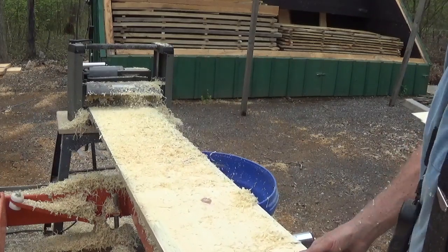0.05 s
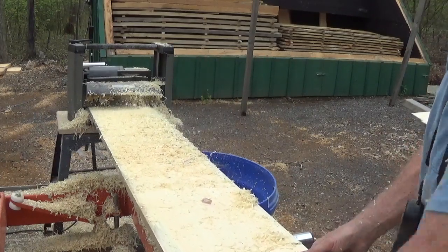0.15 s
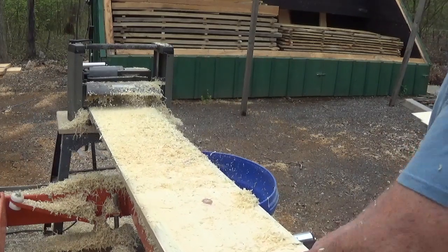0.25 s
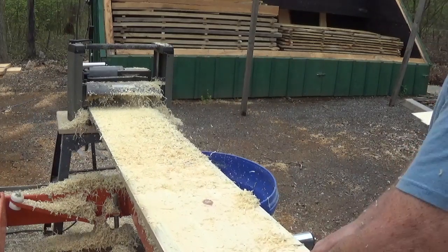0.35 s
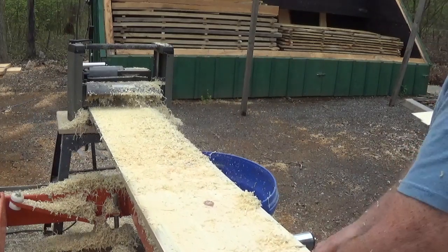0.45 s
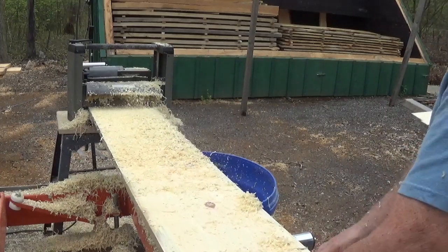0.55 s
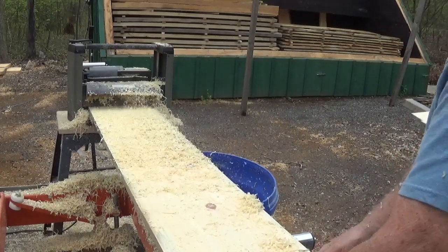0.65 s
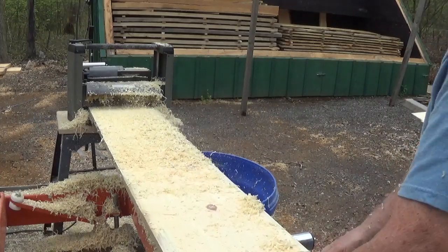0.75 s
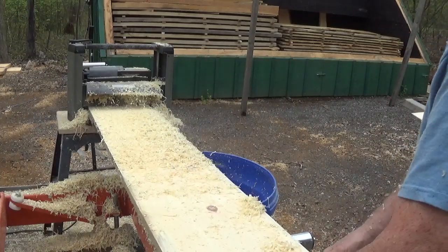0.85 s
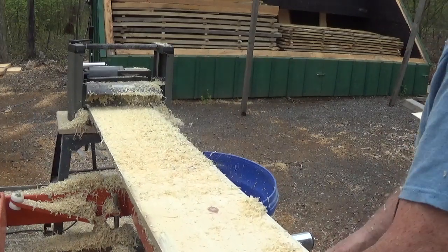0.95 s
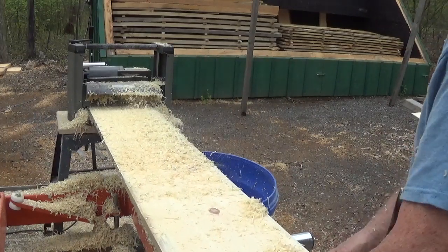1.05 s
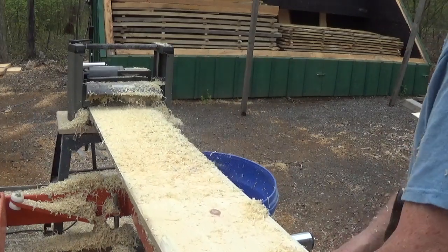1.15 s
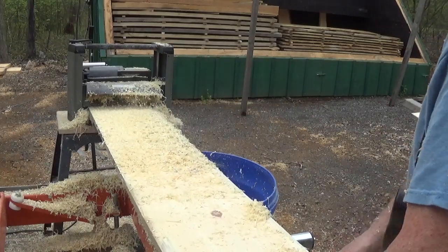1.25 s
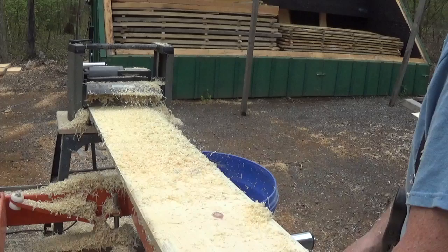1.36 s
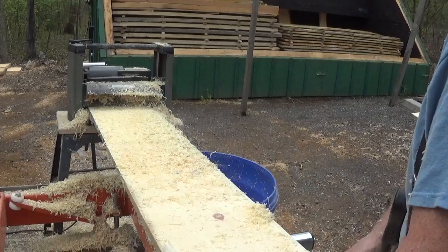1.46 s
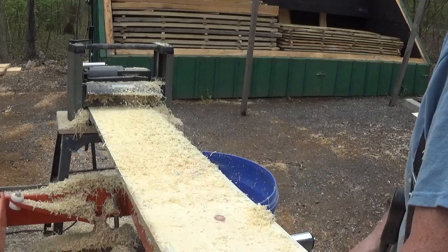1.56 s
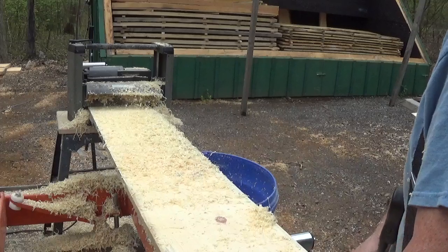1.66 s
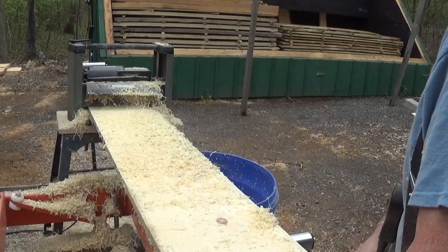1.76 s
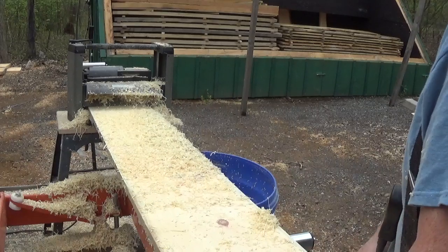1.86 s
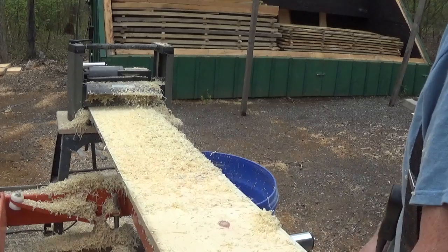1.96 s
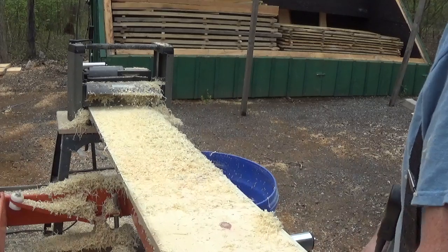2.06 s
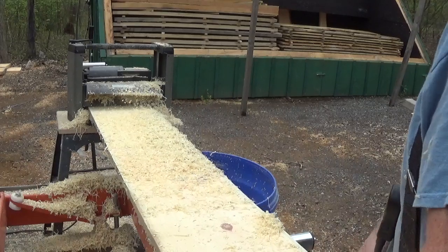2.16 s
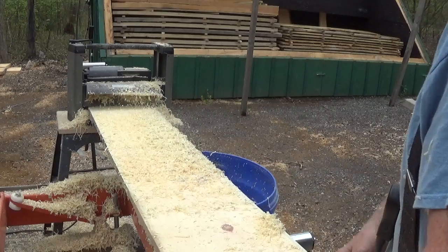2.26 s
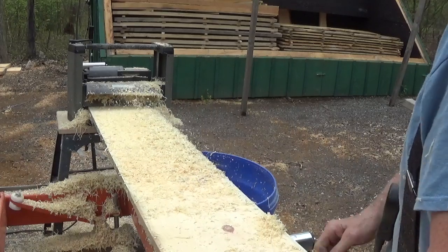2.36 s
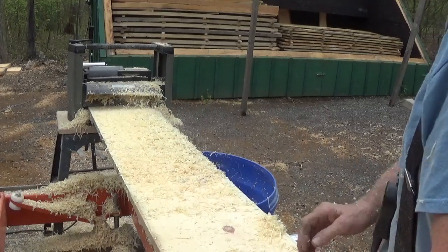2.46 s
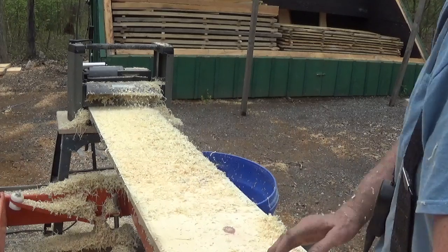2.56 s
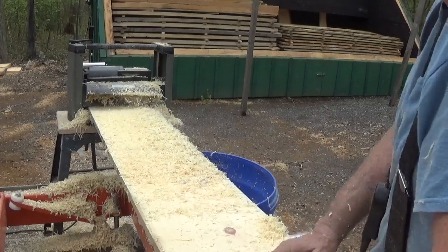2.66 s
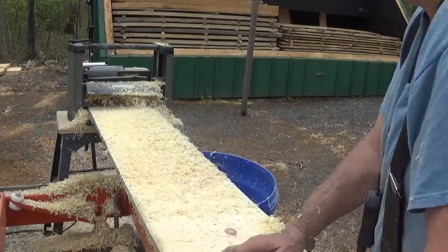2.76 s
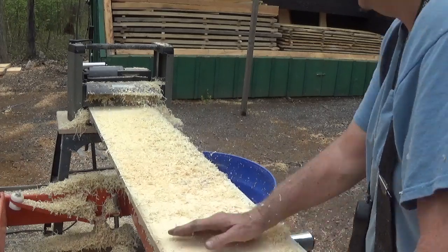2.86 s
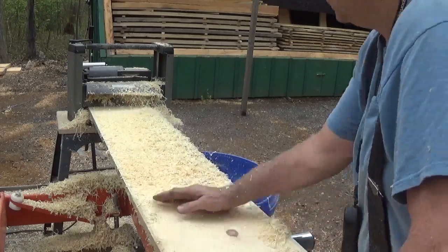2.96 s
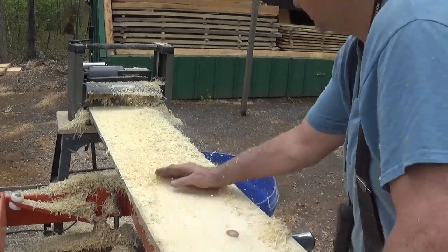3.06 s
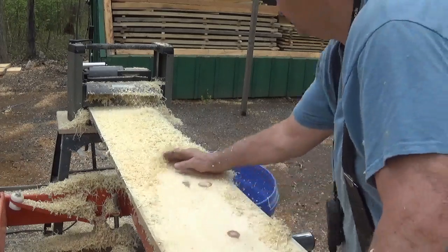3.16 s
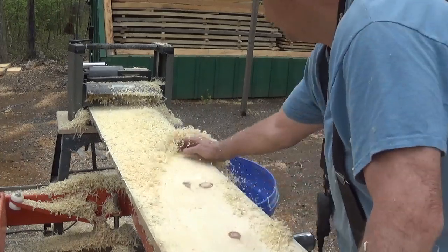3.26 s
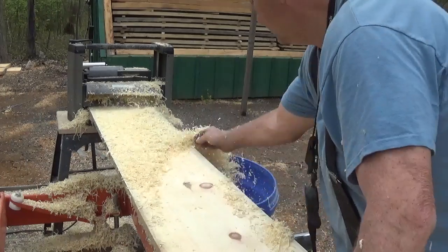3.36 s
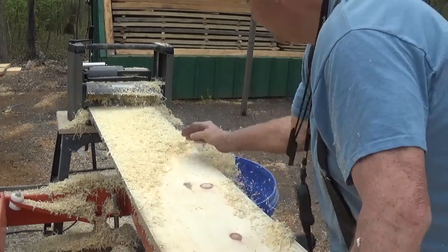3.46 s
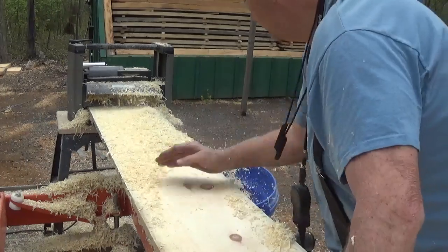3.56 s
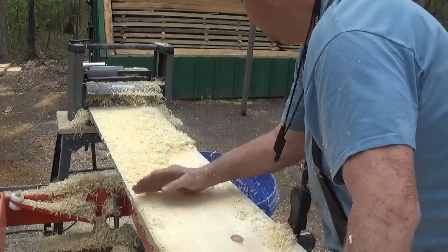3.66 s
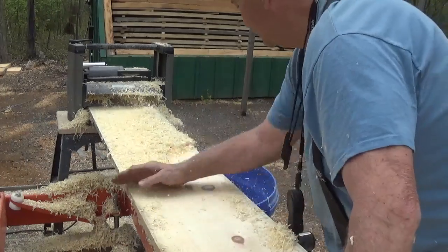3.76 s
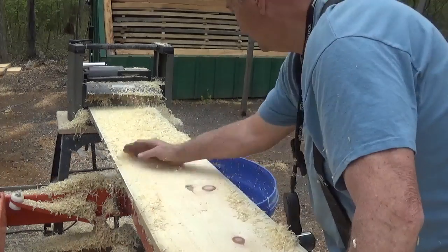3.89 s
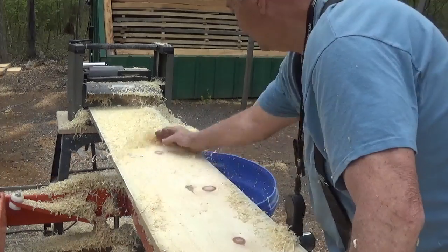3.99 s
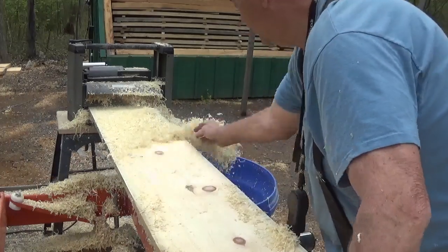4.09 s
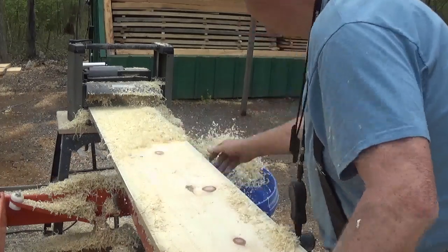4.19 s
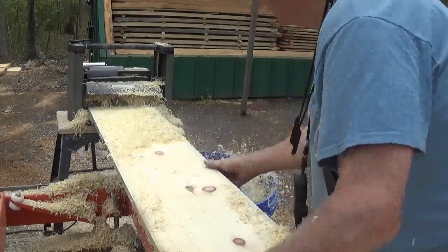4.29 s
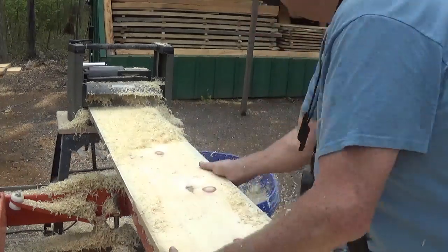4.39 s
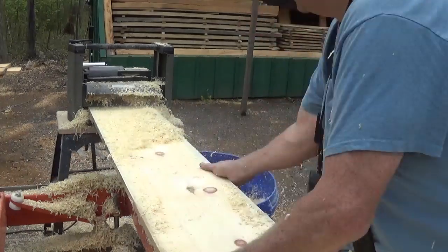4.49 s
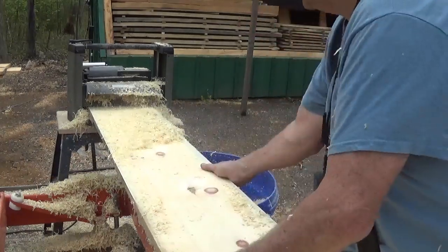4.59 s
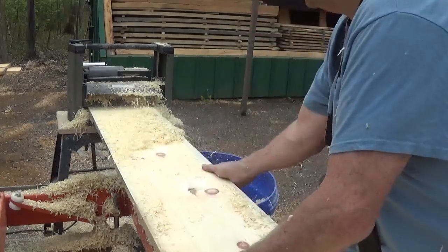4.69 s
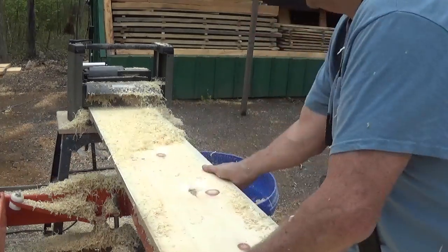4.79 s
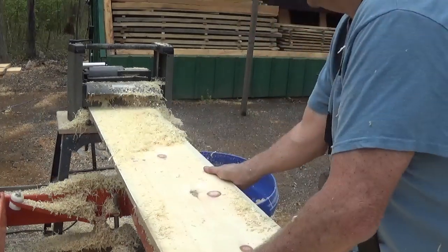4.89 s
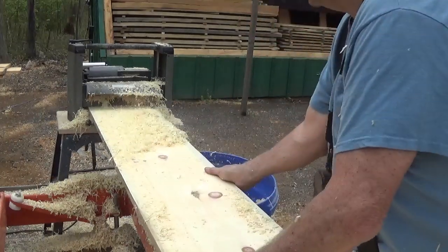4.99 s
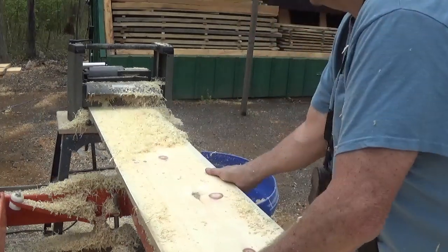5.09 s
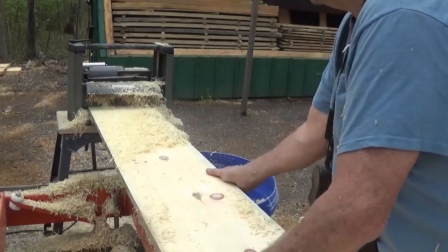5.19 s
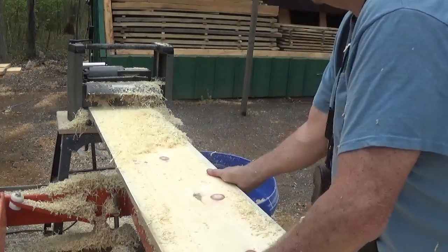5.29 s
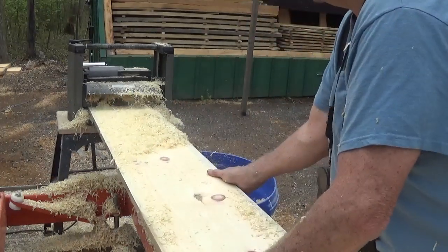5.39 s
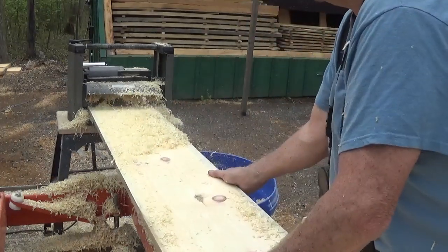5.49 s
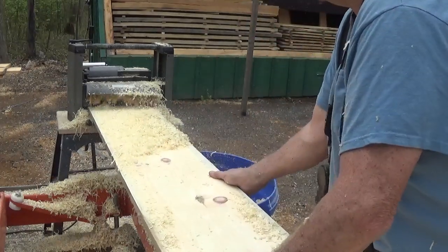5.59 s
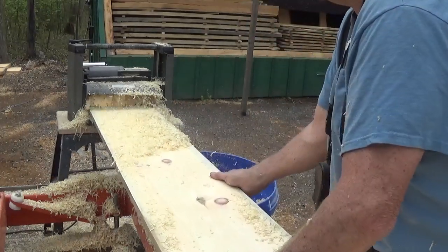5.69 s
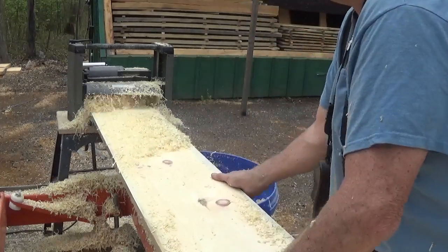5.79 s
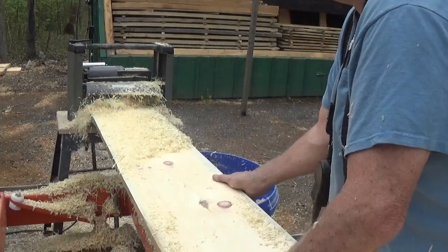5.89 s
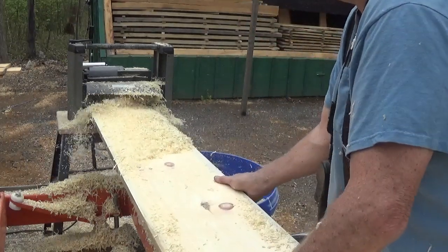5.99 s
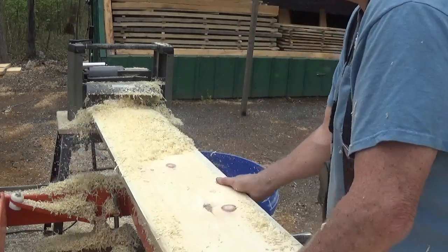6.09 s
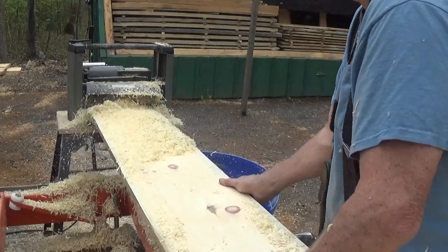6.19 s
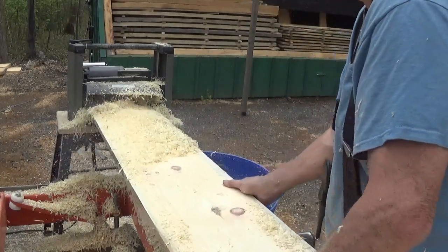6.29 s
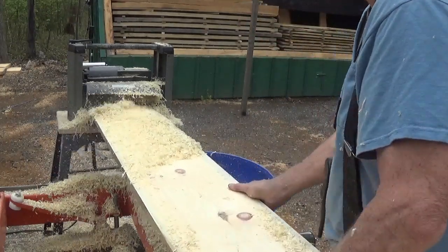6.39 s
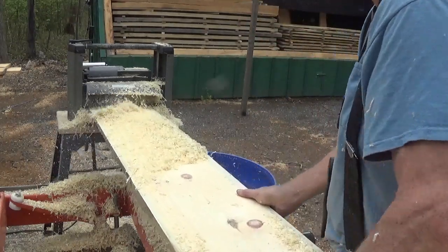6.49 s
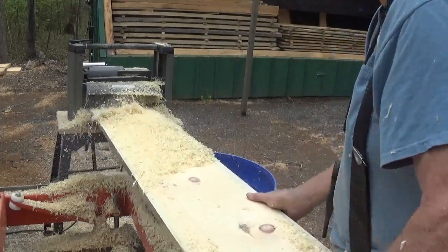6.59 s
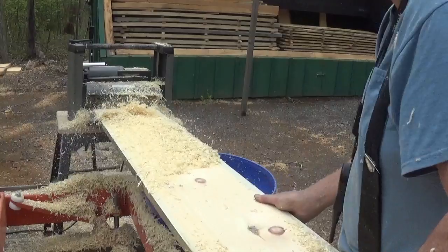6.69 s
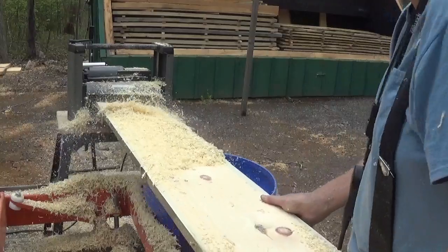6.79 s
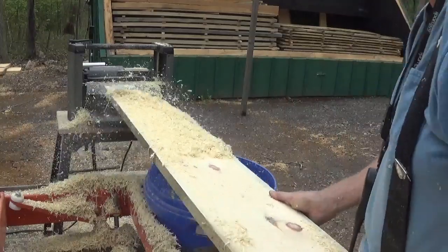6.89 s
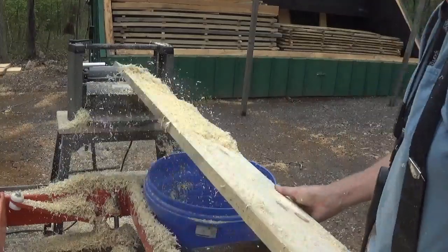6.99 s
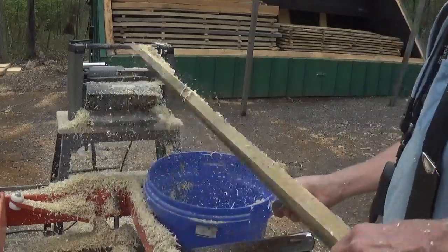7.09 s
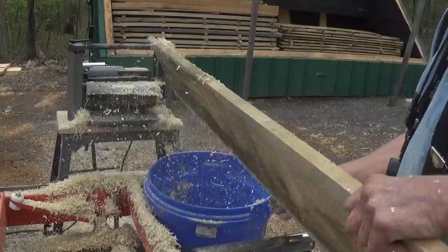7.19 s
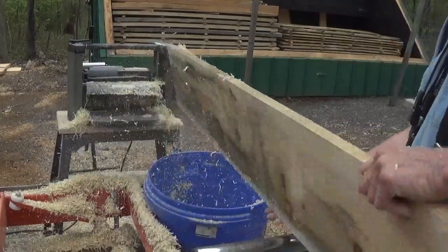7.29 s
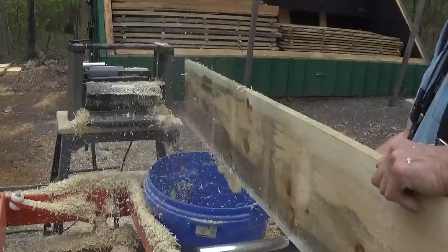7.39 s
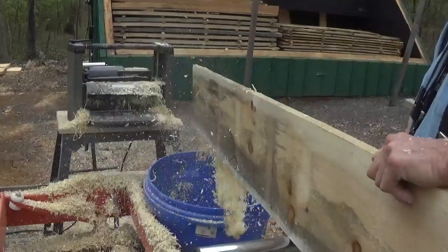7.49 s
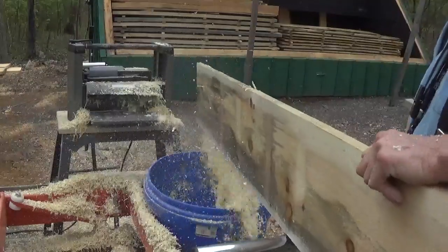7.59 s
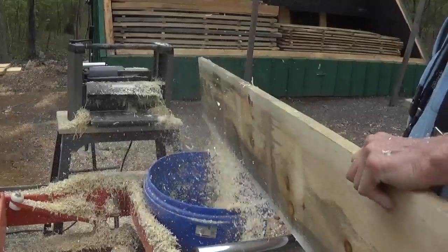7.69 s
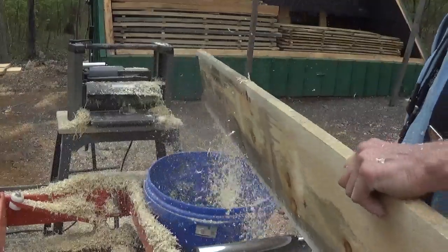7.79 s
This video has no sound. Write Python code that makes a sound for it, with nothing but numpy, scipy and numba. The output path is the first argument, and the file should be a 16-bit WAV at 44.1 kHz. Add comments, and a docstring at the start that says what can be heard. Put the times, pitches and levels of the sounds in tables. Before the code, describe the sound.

A benchtop planer is already cutting a wide board, a loud, harsh, rough buzz with gliding hollow howls and tearing chip noise. Just before six seconds the board clears and the cut stops abruptly, leaving a much quieter airy motor whine that climbs in pitch. The board, lifted off, knocks once, short and bright. Close stereo microphone in an open yard with faint dull echoes, dry and slightly limited on top.

```python
"""Benchtop planer, one board

Outdoors, two knives strike a wide board in turn; the blows ring resonances that swell and glide as it feeds.
The board clears and the motor runs up free: noise bands for air, sines locked to the head for spinning parts.
The board is lifted off and knocks once on something hard: a noise crack and short decaying modes.
The ground, a shed and a stack return a few dull echoes of the cut and the knock."""
import sys
import numpy as np
from scipy import signal
from scipy.io import wavfile
from scipy.ndimage import uniform_filter1d
from numba import njit

SR = 44100
rng = np.random.default_rng(int(sys.argv[2]) if len(sys.argv) > 2 else 0)


def unload_wav(signal):
    """Save mono or channel-first audio to the path in sys.argv[1] as 16-bit WAV at rate SR, clipped to [-1, 1]."""
    wavfile.write(
        sys.argv[1],
        SR,
        np.round(np.clip(np.atleast_2d(signal).T, -1, 1) * 32767).astype(np.int16),
    )


N = 346185
SECONDS = np.arange(N) / SR


# knives in the wood: start_s, gain_db
CONTACT = [(5.8, 2.5), (5.83, 1), (5.85, -28), (5.9, -53)]
# roughness of the tearing grain, on blow scatter and tearing alike: start_s, gain_db
GRAIN = [(0, 1.5), (3, 2), (4.3, 5), (4.85, -1), (4.93, 5.5), (5.3, 1.5), (5.8, 0)]
# loudness of the cut: start_s, middle_db, then against the middle: low_end_db, treble_db, top_db
CUT = [(0.0, -16.5, -17, -7.5, -13), (0.29, -18.5, -11.5, -4.5, -8), (0.43, -17, -30, -8, -10),
       (0.7, -20, -17.5, -7.5, -10.5), (1.38, -19, -18, -7, -10.5), (2.25, -16, -18.5, -9, -16),
       (2.55, -20, -26, -8.5, -11), (2.82, -20, -21, -9, -13), (2.96, -17, -23, -9.5, -13),
       (3.8, -18.5, -8, -10, -10), (4.31, -16.5, -4, -6.5, -13), (4.5, -18, -4.5, -5, -12.5),
       (4.68, -20.5, 4, -3.5, -9.5), (4.88, -18, -8.5, -2, -9), (4.96, -16.5, -3.5, -9, -11.5),
       (5.09, -14, -8.5, -11.5, -15), (5.31, -18.5, -6.5, -10, -17), (5.65, -17.5, -9.5, -5, -12.5),
       (5.78, -18.5, -13, -1.5, -10)]
BOARD_CUT_HZ = 232   # the board radiates little below here


def cutting(turns):
    """Blows ring the board; chips fly and the frame shakes while the knives are in the wood."""
    grain = from_db(in_time(GRAIN)[0])
    cut_db = in_time(CUT)
    blows = knife_blows(turns, grain)
    board = rings(turns) + board_resonances(blows, cut_db) + swells(blows)
    highpass = signal.butter(4, BOARD_CUT_HZ, "high", fs=SR, output="sos")
    out = signal.sosfilt(highpass, board) + chips(grain) + frame_shake(turns, cut_db)
    return from_db(in_time(CONTACT)[0]) * out


EDGE_LAG_MS = 0.041   # the knives differ in edge shape: their unlike part lands just after the blow
TEAR_MS = 3.6   # time constant of the tearing burst after each blow


def knife_blows(turns, grain):
    """Like blows give even multiples of head speed, unlike knives the odd; scatter and tearing add noise."""
    count = int(2 * turns[-1])
    alike = knife_train(turns, np.ones(count))
    unlike = knife_train(turns, (-1.) ** np.arange(count), EDGE_LAG_MS)
    uneven = knife_train(turns, rng.standard_normal(count))
    burst = signal.lfilter([1], [1, -np.exp(-1000 / (TEAR_MS * SR))], alike)
    torn = rms_one(burst * rng.standard_normal(N)) * np.std(alike)
    return np.array([alike, drawn_out(alike), unlike, drawn_out(unlike), grain * uneven, grain * torn])


def knife_train(turns, sizes, lag_ms=0.):
    """One blow each half turn, shared between the two samples around its exact time."""
    at = np.interp(np.arange(len(sizes)) / 2, turns, np.arange(N)) + lag_ms * SR / 1000
    whole = np.minimum(at.astype(int), N - 2)
    out = np.zeros(N)
    out[whole] = sizes * (1 - at + whole)
    out[whole + 1] = sizes * (at - whole)
    return out


# short paths through board and bed: path_ms, feedback_share
PATHS = [(.37, .85), (.83, .85), (1.61, .85)]


def drawn_out(x):
    """A chain of all-pass delays: the spectrum stays, the blow spreads in time."""
    for ms, share in PATHS:
        taps = np.zeros(round(ms * SR / 1000) + 1)
        taps[[0, -1]] = 1, -share
        x = signal.lfilter(taps[::-1], taps, x + 1e-18)
    return x


# unlikeness of the two knives' bite: start_s, mismatch_0_to_1
MISMATCH = [(0, 0.77), (3.2, 0.92), (3.5, 0.75), (4.1, 0.74), (4.4, 0.46), (4.9, .2), (5.05, 0.26),
            (5.5, 0.2), (5.8, 0.6)]
# resonances of board and bed: centre_hz, width_hz, level_db (against its part of the cut), mismatch_share_0_to_1,
# scatter_0_to_1, tearing_0_to_1, left_right_db, left_lead_ms, drawn_out_share_0_to_1
BOARD = [(444, 143, -10.5, 1, 0, 0.05, 1, 0.24, 0.63), (776, 255, -2, 0.45, 0.08, 0.03, 4, 0.15, 1),
         (1121.4, 350, -8.5, 0.62, 0.02, 0.07, 1, 0.013, 0.82),
         (1580, 320, -10.5, 0.91, 0.11, 0.03, 0.5, -0.0044, 0.85),
         (2138, 386, -12.5, 0.58, 0.01, 0.09, -3, -0.021, 0.7),
         (2760, 700, -4.5, 0.96, 0.11, 0.36, -2, -0.0025, 0.15),
         (3780, 820, -8, 1, 0.1, 0.25, -2.5, 0.019, 0.36),
         (4510, 1490, -6.5, .8, 0.05, 0.19, -1.5, 0.01, 0.46),
         (7060, 2400, -3, 0.95, 0.21, 0.38, -1.7, 0.0114, 0.44),
         (9120, 2600, -9, 0.5, 0.32, 0.62, -1, 0.0068, 0.4)]
LOW_END_HZ, TREBLE_HZ, TOP_HZ = 850, 2400, 5400


def board_resonances(blows, cut_db):
    """Fixed resonances driven by the blows, each following its part of the cut."""
    middle_db, low_db, treble_db, top_db = cut_db
    mismatch, = in_time(MISMATCH)
    out, cut = np.zeros((2, N)), slice(round(CONTACT[-1][0] * SR))
    for kind, (hz, _, level_db, mismatch_share, *_) in enumerate(BOARD):
        if hz < LOW_END_HZ:
            part_db = low_db
        elif hz > TOP_HZ:
            part_db = top_db
        else:
            part_db = treble_db if hz > TREBLE_HZ else 0
        rung = ring_board(blows, kind, np.full(cut.stop, hz), mismatch_share * mismatch[cut], cut)
        out[:, cut] += from_db(middle_db + part_db + level_db)[cut] * rung
    return out


# resonances that move as the board feeds: start_s, length_s, from_hz, to_hz, level_db, mismatch_0_to_1
SWELLS = [(-.4, 1.33, 504, 482, -38, 0.94), (-.6, 1.73, 1550, 1755, -23, 0.8), (0, 1.1, 2880, 2900, -35, 1),
          (0.398, 1.45, 1890, 2265, -24, 0.53), (0.396, 0.97, 4700, 4800, -31, 0.6),
          (.9, 1.74, 1210, 1310, -24, 0.2), (1.195, 0.75, 3020, 3050, -29.5, 1),
          (1.396, 2.56, 1560, 1580, -26, 0.9), (1.605, 1.6, 4360, 5360, -43, 0.4),
          (2.395, 0.75, 1940, 2200, -30, 0), (2.195, 0.55, 1050, 1030, -26.5, 0.25),
          (2.742, 0.75, 870, 875, -29.5, 0.25), (2.883, 1.0, 2710, 2660, -34.5, 0.6),
          (3.194, 1.23, 1980, 1910, -24, 0.54), (3.244, 0.78, 980, 944, -24.5, 0.26),
          (3.79, 0.55, 3600, 3570, -35, .4), (3.91, 0.76, 931.4, 890, -18.5, 0.03),
          (4.137, 0.39, 493, 495, -27, 0.07), (4.206, 0.79, 2170, 2040, -23.5, 0.4),
          (4.26, 0.39, 1570, 1620, -33, .05), (4.5, .6, 3940, 4240, -28, 1),
          (4.6, 0.3, 950, 950, -19.5, 0.24), (4.883, 0.42, 1070, 1090, -25, 0.52),
          (5.055, 0.64, 776, 816, -25.5, 0.43), (5.04, 0.78, 1730, 1750, -22.5, 0.29),
          (5.4, 0.42, 3820, 4270, -31, 0), (5.45, 0.44, 939, 1000, -32, 0.7),
          (4.55, 0.51, 5440, 5830, -28, 0.97), (0.105, 0.54, 8250, 7600, -35.5, 0.5),
          (1.097, 0.79, 6540, 7700, -40, 0.3), (3.81, 0.89, 7300, 6790, -39.5, 0.94),
          (5.553, 0.84, 2790, 3020, -35, 1)]
SWELL_SHARPNESS = 0.68   # power of the half sine


def swells(blows):
    """A resonance swells, glides and fades as the board feeds through."""
    out = np.zeros((2, N))
    for start_s, length_s, from_hz, to_hz, level_db, mismatch in SWELLS:
        span = slice(max(round(start_s * SR), 0), round((start_s + length_s) * SR))
        done = np.clip((SECONDS[span] - start_s) / length_s, 0, 1)
        # the nearest board resonance lends its character
        kind = np.argmin([abs(np.log(row[0] / from_hz)) for row in BOARD])
        gain = from_db(level_db) * np.sin(np.pi * done) ** SWELL_SHARPNESS
        hz = from_hz + (to_hz - from_hz) * done
        out[:, span] += gain * ring_board(blows, kind, hz, mismatch, span)
    return out


# the paths through the moving board shift, most where the blow comes direct
PATH_WANDER_RAD, PATH_WANDER_HZ = 2.25, 0.77


def ring_board(blows, kind, hz, mismatch, span):
    """The blows through one resonance of the board, at even level."""
    width_hz, _, _, scatter, tearing, pan_db, lead_ms, drawn = BOARD[kind][1:]
    alike, alike_late, unlike, unlike_late, uneven, torn = blows[:, span]
    mismatch, drawn = np.clip(mismatch, 0, 1), np.clip(drawn, 0, 1)
    # direct and drawn-out blows interfere, so neighbouring multiples differ in strength
    direct = 1 - drawn
    drawn = drawn * np.cos(PATH_WANDER_RAD * direct ** 2 * drift(PATH_WANDER_HZ)[span])
    force = np.sqrt(1 - mismatch ** 2) * (direct * alike + drawn * alike_late)
    force += mismatch * (direct * unlike + drawn * unlike_late)
    force += scatter * uneven + tearing * torn
    twice_cos, r = 2 * np.cos(2 * np.pi * hz / SR), np.exp(-np.pi * width_hz / SR)
    rung = glide(glide(force, twice_cos, r), twice_cos, r)   # twice, for steep skirts
    rung = rung / np.sqrt(uniform_filter1d(rung ** 2, size=4410) + 1e-9)   # over 0.1 s
    samples = np.arange(len(rung))
    lagged = np.interp(samples - lead_ms * SR / 1000, samples, rung)
    polarity = (-1) ** kind
    return polarity * np.array([rung, lagged]) * from_db([[pan_db / 2], [-pan_db / 2]])


@njit
def glide(x, twice_cos, r):
    """Two-pole resonance with a moving centre."""
    y = np.zeros(len(x))
    for i in range(2, len(x)):
        y[i] = x[i] - x[i - 2] + r * twice_cos[i] * y[i - 1] - r * r * y[i - 2]
    return y


# head-speed multiples that catch a narrow board mode: start_s, length_s, multiple, level_db
RINGS = [(0.32, 0.54, 10, -29.5), (0.907, 0.94, 11, -25.5), (0.933, 0.48, 26, -30.5),
         (1.645, 0.95, 20, -30.5), (1.928, 0.43, 39, -35.5), (2.308, 0.32, 10, -37), (2.42, 0.47, 42, -45),
         (2.823, 0.7, 18, -25.5), (2.95, 0.62, 4, -33), (3.61, 0.63, 32, -31.5), (3.85, 0.19, 39, -34),
         (3.853, 0.36, 7, -39), (3.92, 0.6, 48, -35), (4.15, 0.2, 18, -22), (4.54, 0.31, 7, -29),
         (5.15, 0.43, 22, -28.5), (5.295, 0.33, 11, -28), (5.386, 0.17, 8, -21.5), (5.447, 0.19, 16, -24)]


def rings(turns):
    """Each ring swells and fades on its multiple of the head speed."""
    out = np.zeros(N)
    for (start_s, length_s, multiple, level_db), phase_turns in zip(RINGS, rng.random(len(RINGS))):
        span = slice(max(round((start_s - .06) * SR), 0), round((start_s + length_s + 0.093) * SR))
        wave = np.sin(2 * np.pi * (multiple * turns[span] + phase_turns))
        out[span] += np.sqrt(2) * from_db(level_db) * signal.windows.tukey(len(wave), .55) * wave
    return placed(out, .2, .01)


# chip noise spectrum: pitch_hz, relative_db
CHIPS = [(15, -72), (25, -40), (175, -42), (216, -13), (441, -8.5), (612, -1.5), (900, -0.5), (1070, -10),
         (1130, 5.5), (1300, 7), (1640, -6.5), (2500, 3), (3250, -42), (5500, -120)]
CHIPS_DB = -32


def chips(grain):
    """Chips and shaking frame: banded noise that follows the grain."""
    return from_db(CHIPS_DB) * grain * banded_noise(CHIPS, patchy_db=2.6, shared_db=1.0)


# frame shaken at the head speed: multiple, offset_db
SHAKE = [(1, -56.5), (2, -46), (3, -41.5)]
SHAKE_FOLLOWS = 0.27   # share of the low end's swing


def frame_shake(turns, cut_db):
    """Low multiples of the head speed shake the frame, following the low end of the cut."""
    middle_db, low_db = cut_db[:2]
    follow_db = SHAKE_FOLLOWS * (middle_db + low_db)
    return sum(tone(turns, multiple, offset_db + follow_db, waver_db=3.5) for multiple, offset_db in SHAKE)


# the blow: start_s, gain_db
KNOCK = [(7.4146, -6.5)]
# ringing modes: pitch_hz, level_db (against the blow), t60_s
KNOCK_MODES = [(235, -15, 0.067), (1510, -9, 0.036), (2020, -17, 0.043), (2420, -14, .03),
               (3420, -12, 0.017), (9800, -1, 0.0077)]
CRACK_DB, CRACK_MS = -3, 2.6   # gain, time constant


def knock():
    """A sharp bright crack of decaying noise and the short ring of the board's modes."""
    click = np.full(N, 1e-18)
    for start_s, gain_db in KNOCK:
        click[round(start_s * SR)] = from_db(gain_db)
    fade = np.exp(-1000 / (CRACK_MS * SR))
    crack = signal.lfilter([1], [1, -fade], click) * rng.standard_normal(N)
    out = from_db(CRACK_DB) * signal.lfilter(*signal.butter(2, 2500, "high", fs=SR), crack)
    for hz, level_db, t60_s in KNOCK_MODES:
        r, w = from_db(-60 / (t60_s * SR)), 2 * np.pi * hz / SR
        out += signal.lfilter([0, from_db(level_db) * np.sin(w)], [1, -2 * r * np.cos(w), r * r], click)
    return placed(signal.lfilter(*signal.butter(2, 220, "high", fs=SR), out), .3)


# cutter head under load: start_s, turns_per_s
SPEED = [(0.0, 114.2), (0.34, 115.8), (0.58, 114.1), (1.03, 113.6), (1.78, 114.1), (2.1, 113.1),
         (2.42, 114.3), (2.54, 115.2), (2.99, 116.0), (3.18, 115.9), (3.33, 114.6), (3.49, 114.6),
         (3.8, 112.9), (4.12, 114.5), (4.43, 116.9), (4.77, 111.3), (4.96, 110.4), (5.14, 112.8),
         (5.44, 115.2), (5.65, 116.0), (5.75, 117.6), (5.8, 118)]
FREE_TURNS_PER_S, RUN_UP_S = 168, .88   # free speed, time constant


def head_speed():
    """Turns a second: held down by the cut, then rising exponentially towards the free speed."""
    clear_s, loaded = SPEED[-1]
    lag = np.exp(-np.maximum(SECONDS - clear_s, 0) / RUN_UP_S)
    free = FREE_TURNS_PER_S - (FREE_TURNS_PER_S - loaded) * lag
    return np.where(SECONDS < clear_s, in_time(SPEED)[0], free)


# noise spectra: pitch_hz, relative_db
RUSH = [(290, -40), (500, -29), (612, -22), (709, -24), (837, -19), (960, -16.5), (1010, -3), (1230, -27),
        (1830, -9), (2200, -17.5), (2950, -33), (4500, -39), (5850, -71), (9900, -120)]
RUMBLE = [(15, -75), (25, -39), (107, -39), (151, -18), (204, -25), (321, -6.5), (479, -10), (600, -4),
          (780, -19), (1320, -120)]
HISS = [(1760, -47), (3000, -5), (3840, -12), (5520, -9), (5970, -9.5), (6640, -6), (7180, -11.5),
        (10400, -19.5), (11400, -25), (14800, -55), (22000, -120)]
# noise levels: free_speed_db (under the board), loss_db (per turn/s below free), lifted_gain_db (board away)
RUSH_LEVEL = (-34.5, 0.0043, 4.3)
RUMBLE_LEVEL = (-38, 0.22, 3)
HISS_LEVEL = (-38, 0.075, 5)
LIFT_S, LIFT_TAKES_S = 7.01, 0.43
# shaft, fan and commutator tones: head_multiple, level_db (against the air rush)
WHINE = [(1, -31), (2.62, -16.5), (10, -15.5), (19.14, -14), (31.9, -28.5), (34, -20), (38.3, -30),
         (68, -31)]
# hood colour on the siren tones of the passing knives: pitch_hz, level_db
HOOD = [(250, -54), (270, -39.5), (288, -43), (302, -55), (325, -42.5), (510, -45), (565, -37), (605, -35),
        (648, -29), (790, -49), (853, -34.5), (878, -48), (950, -41.5), (975, -43), (1060, -53),
        (1266, -44.5), (1310, -48)]
SIREN_MULTIPLES = [2, 4, 6, 8]


def motor(speed, turns):
    """Air rush, rumble and hiss as noise; siren and whine tones locked to the head speed."""
    lifted = np.clip((SECONDS - LIFT_S) / LIFT_TAKES_S, 0, 1)
    below_free = FREE_TURNS_PER_S - speed
    rush_db, rumble_db, hiss_db = [free_db - loss_db * below_free + lift_db * lifted
                                   for free_db, loss_db, lift_db in (RUSH_LEVEL, RUMBLE_LEVEL, HISS_LEVEL)]
    air = from_db(rush_db) * banded_noise(RUSH, patchy_db=0.9, shared_db=0.9)
    air += from_db(rumble_db) * banded_noise(RUMBLE, patchy_db=1.5, shared_db=-0.6)
    air += from_db(hiss_db) * banded_noise(HISS, patchy_db=2.0, shared_db=0.1)
    siren = sum(tone(turns, k, at_hz(HOOD, k * speed), waver_db=2.0) for k in SIREN_MULTIPLES)
    whine = sum(tone(turns, multiple, level_db + rush_db, waver_db=3.5) for multiple, level_db in WHINE)
    # the board closes the hood while it is cut
    hood_open = np.clip(1 - from_db(in_time(CONTACT)[0] - CONTACT[0][1]), 0, 1)
    tones = placed(siren, 0.69, 0.054) + placed(whine, .8)
    return air * from_db([[.7], [-.7]]) + hood_open * tones


# echoes off ground, shed and stack: left_ms, right_ms, level_db
ECHOES = [(2.305, 2.6, -24.5), (5.885, 4, -20), (11.81, 7.3, -23), (19.75, 26, -19), (30.85, 50, -14),
          (48.3, 40, -33.5)]


def yard(x):
    """A few dull echoes, each side with its own delays."""
    dull = signal.lfilter(*signal.butter(1, 6000, fs=SR), x.mean(axis=0))
    out = np.zeros((2, N))
    for *ms, level_db in ECHOES:
        for side, lag in enumerate(np.round(np.array(ms) * SR / 1000).astype(int)):
            out[side, lag:] += from_db(level_db) * dull[:N - lag]
    return out


# stereo noise: pitch_hz, left_right_likeness
LIKENESS = [(60, 0.85), (220, 1), (810, 0.97), (2980, 0.91), (11000, 0.86)]


def banded_noise(spectrum, patchy_db, shared_db):
    """Third-octave bands of stereo noise, each with its own level, flicker and likeness; rms 1."""
    out, together = 0, shared_db * drift(3)
    edges = 25 * 2 ** np.arange(0, 9, 1 / 3)
    inside = edges[(edges >= spectrum[0][0] * .8) & (edges <= spectrum[-1][0] * 1.2)]
    white = rng.standard_normal((2, 2, N))
    for k, (low, high) in enumerate(zip(inside, inside[1:])):
        band = signal.butter(2, [low, high], "band", fs=SR, output="sos")
        mid, side = signal.sosfilt(band, white[k % 2])   # neighbouring bands use separate noise
        hz = np.sqrt(low * high)
        alike = np.clip(at_hz(LIKENESS, hz), -1, 1)
        gain = from_db(at_hz(spectrum, hz) + patchy_db * drift(8.9) + together)
        out = out + gain * (np.sqrt(1 + alike) * mid + np.sqrt(1 - alike) * side * [[1], [-1]])
    return rms_one(out)


def tone(turns, multiple, level_db, waver_db):
    """A sine locked to the head speed, wavering in level and phase."""
    phase = 2 * np.pi * (multiple * turns + rng.random()) + 0.27 * drift(6.4)
    return np.sqrt(2) * from_db(level_db + waver_db * drift(3.1)) * np.sin(phase)


def drift(rate_hz):
    """Slow chance: noise through a double one-pole low-pass, run at SR / 40; rms 1."""
    r = np.exp(-80 * np.pi * rate_hz / SR)
    noise = rng.standard_normal(N // 40 + 2002)
    slow = signal.lfilter([1], [1, -2 * r, r * r], noise)[2000:]   # settled part
    return np.interp(np.arange(N) / 40, np.arange(len(slow)), rms_one(slow))


def placed(x, pan_db, lead_ms=0.):
    """Mono to stereo by level and arrival time."""
    return np.array([x, late(x, lead_ms)]) * from_db([[pan_db / 2], [-pan_db / 2]])


def late(x, ms):
    """x delayed by a fractional time."""
    return np.interp(SECONDS - ms / 1000, SECONDS, x)


def in_time(rows):
    """Each column of a curve at every sample."""
    start_s, *columns = np.transpose(rows)
    return [np.interp(SECONDS, start_s, column) for column in columns]


def at_hz(points, hz):
    """A spectrum read on a log-frequency axis."""
    points_hz, values = np.array(points).T
    return np.interp(np.log(hz), np.log(points_hz + 1), values)


def from_db(db):
    """Gain of a level in dB."""
    return 10 ** (np.asarray(db) / 20)


def rms_one(x):
    """Scaled to rms 1."""
    return x / np.sqrt(np.mean(x ** 2) + 1e-20)


def scene():
    """Cut and knock with their echoes, over the motor."""
    speed = head_speed()
    turns = np.cumsum(speed) / SR
    struck = cutting(turns) + knock()
    return struck + yard(struck) + motor(speed, turns)


CUTOFF_HZ = 11550


def record(dry):
    """Peaks are rounded, the top is cut."""
    rounded = 0.68 * np.tanh(dry / 0.89)
    return signal.sosfilt(signal.cheby2(22, 70, CUTOFF_HZ, fs=SR, output="sos"), rounded)


dry = scene()
out = record(dry)
unload_wav(out)
```